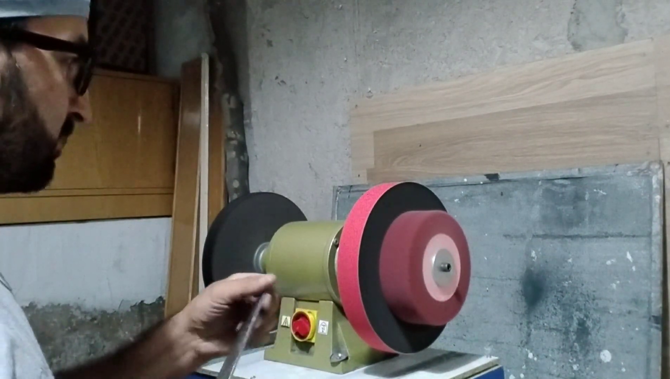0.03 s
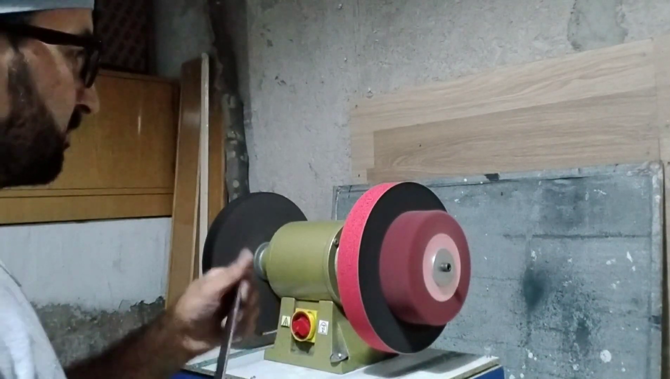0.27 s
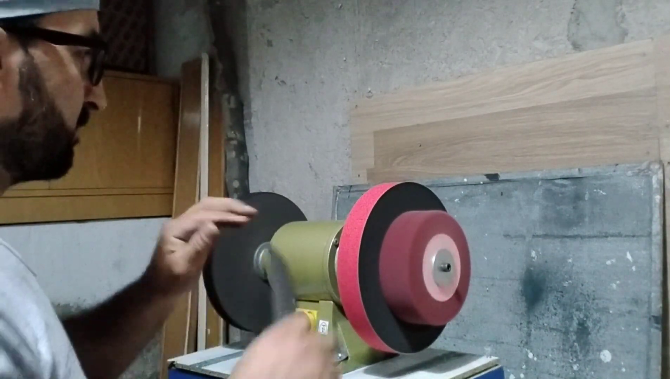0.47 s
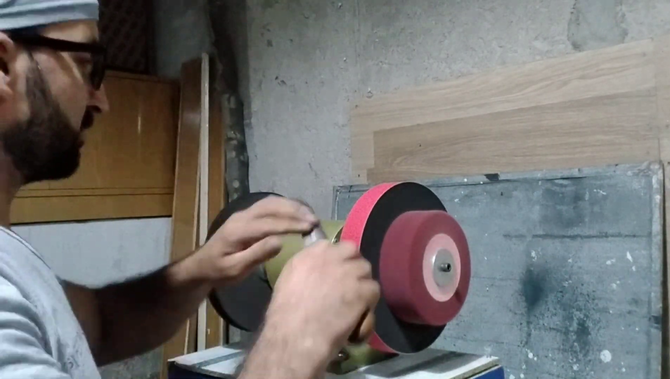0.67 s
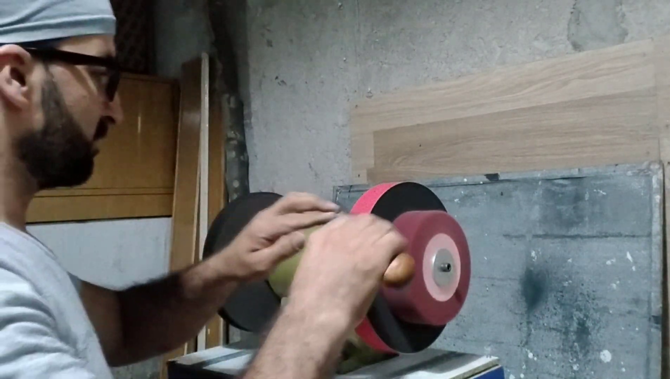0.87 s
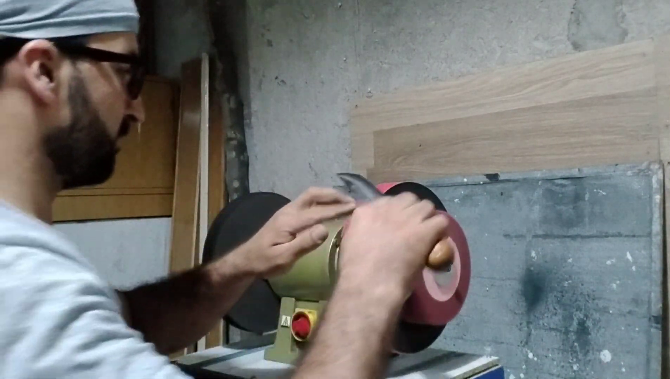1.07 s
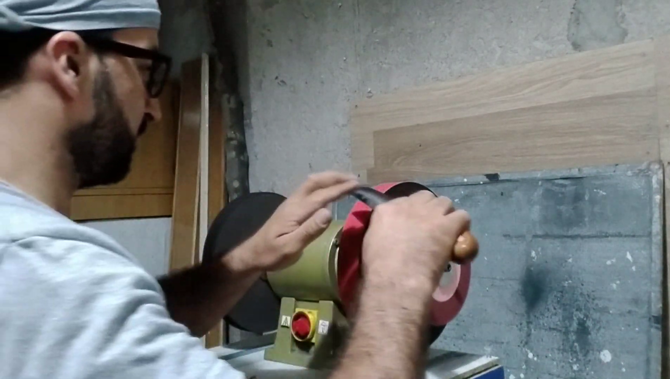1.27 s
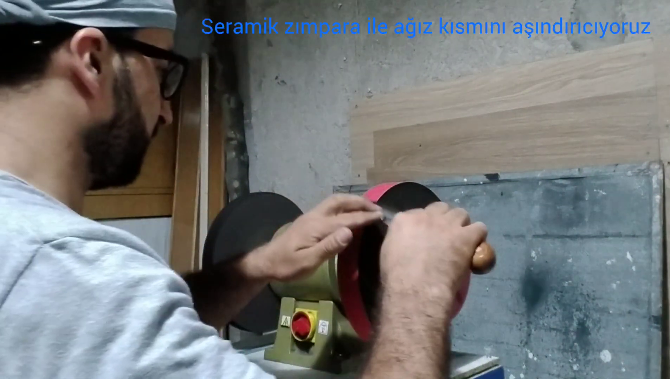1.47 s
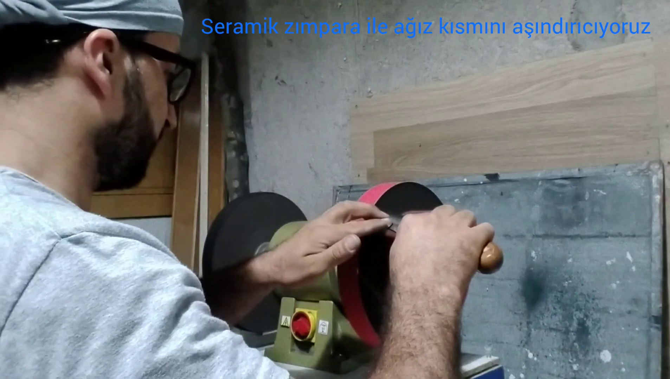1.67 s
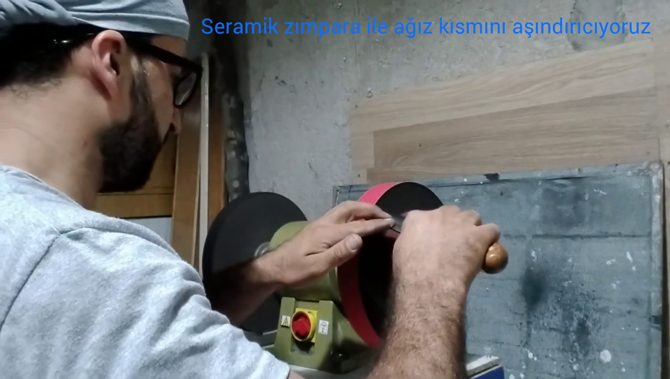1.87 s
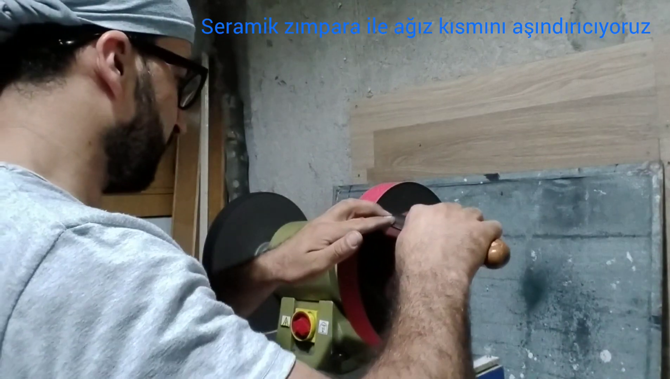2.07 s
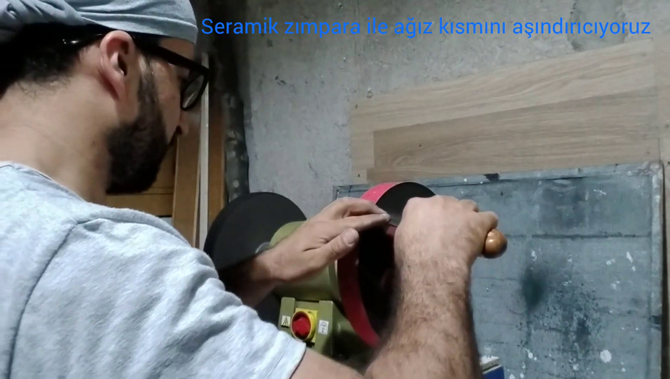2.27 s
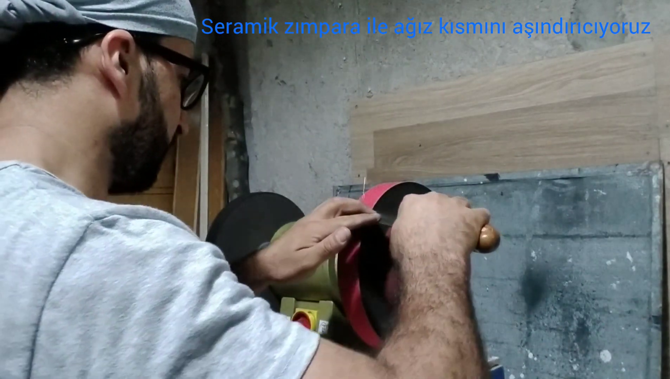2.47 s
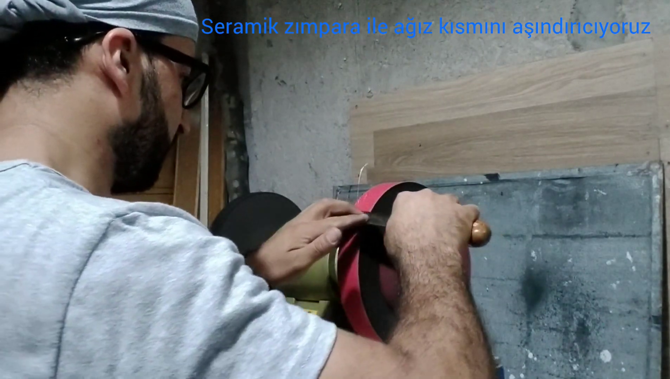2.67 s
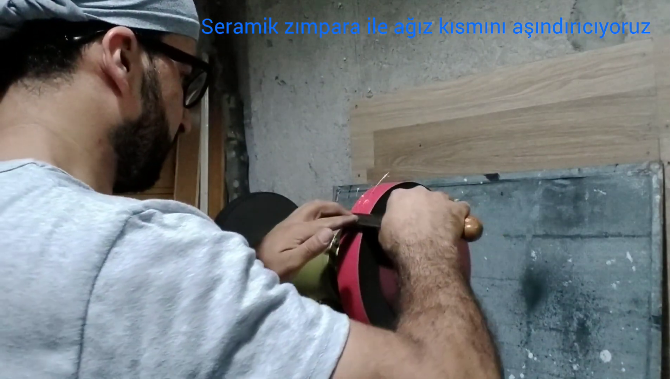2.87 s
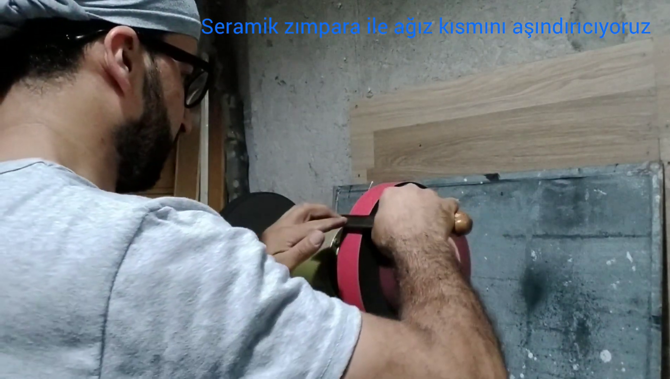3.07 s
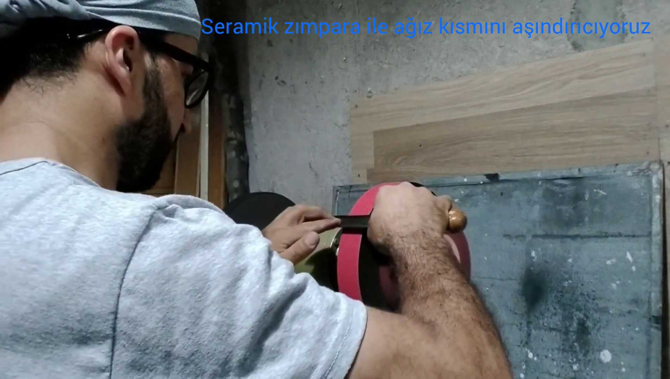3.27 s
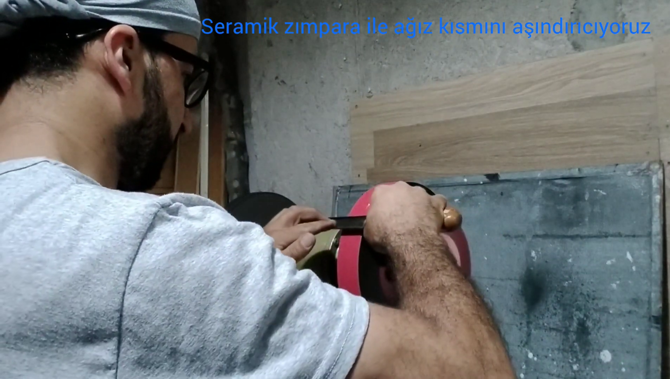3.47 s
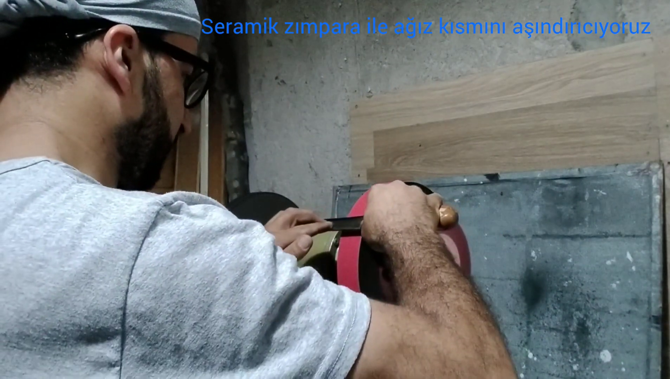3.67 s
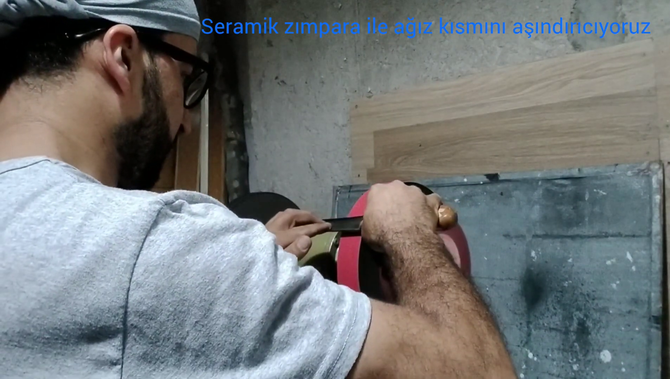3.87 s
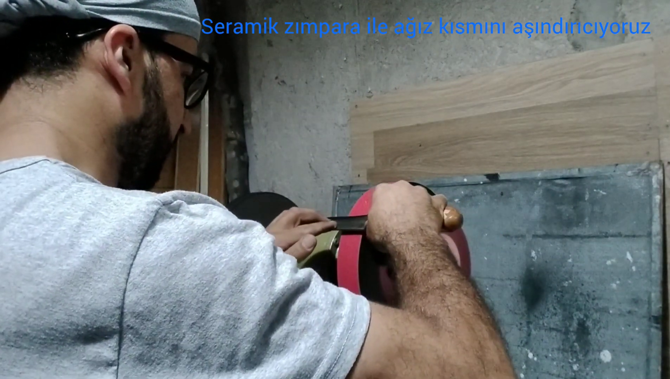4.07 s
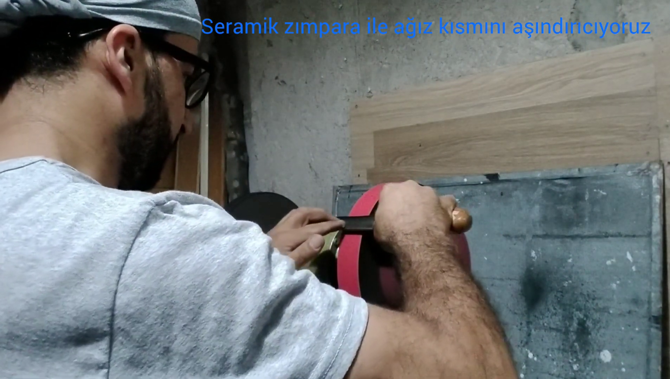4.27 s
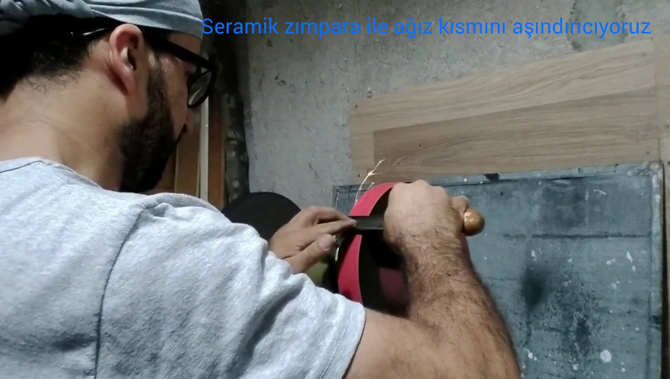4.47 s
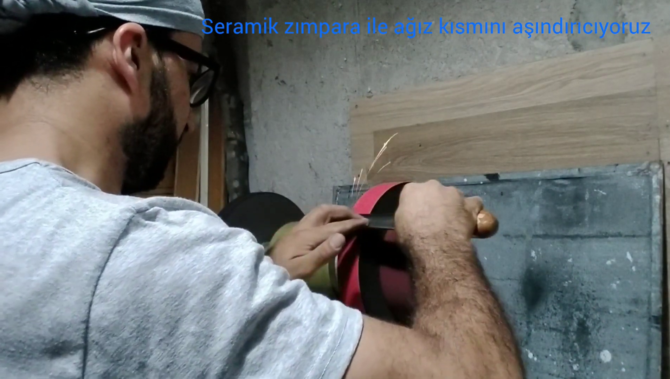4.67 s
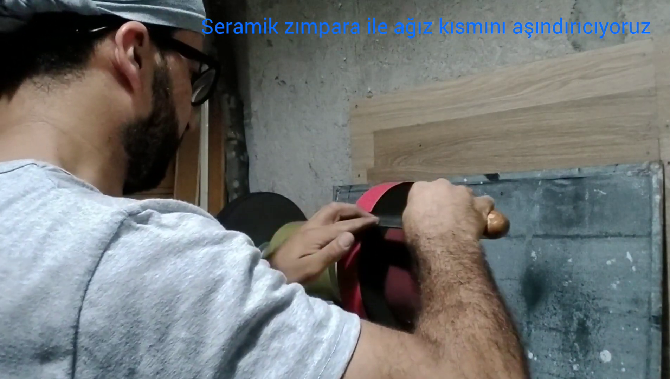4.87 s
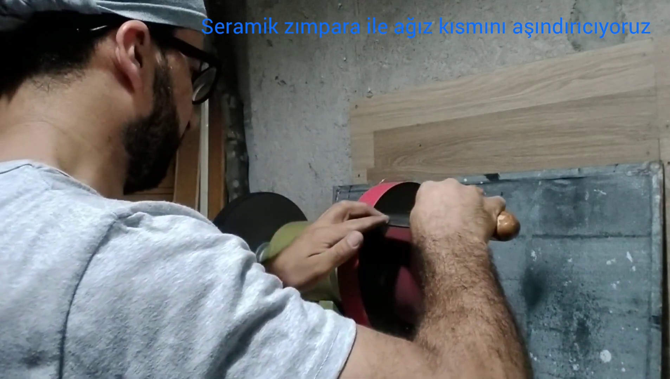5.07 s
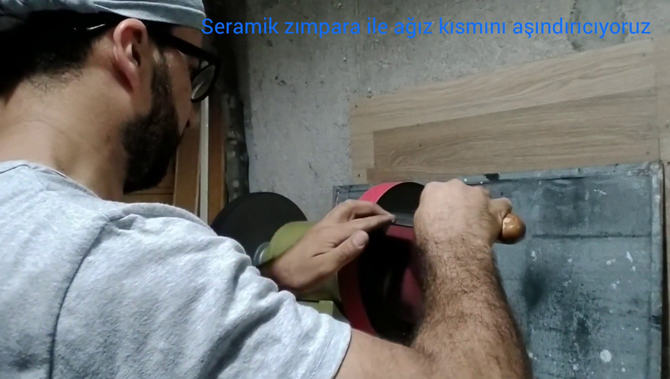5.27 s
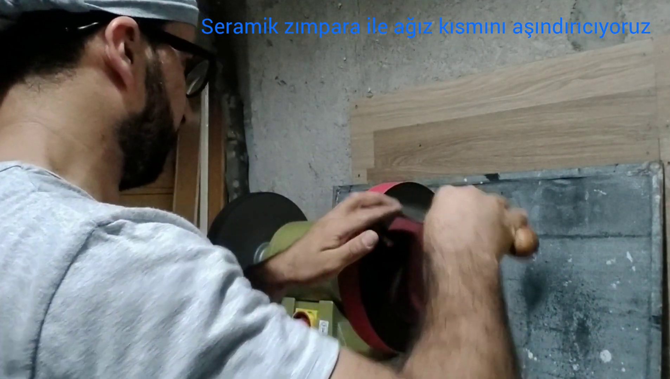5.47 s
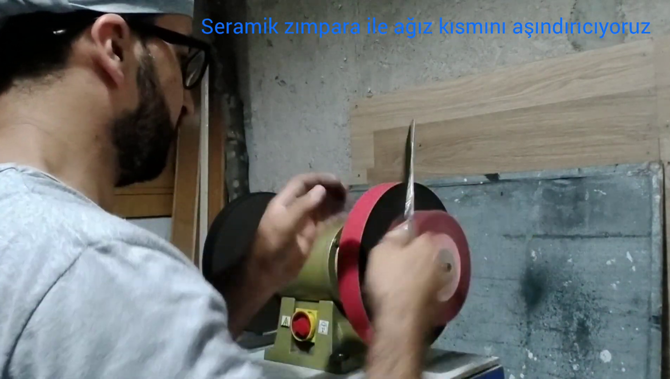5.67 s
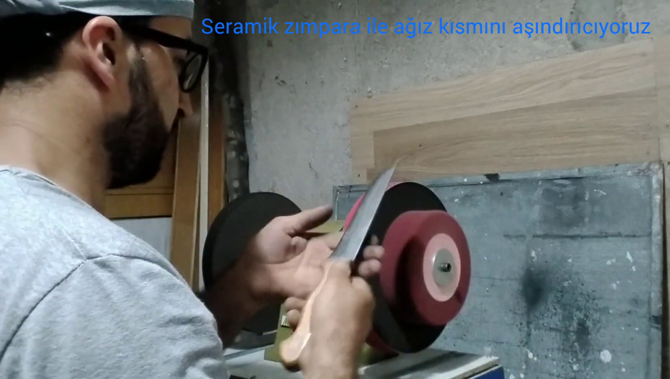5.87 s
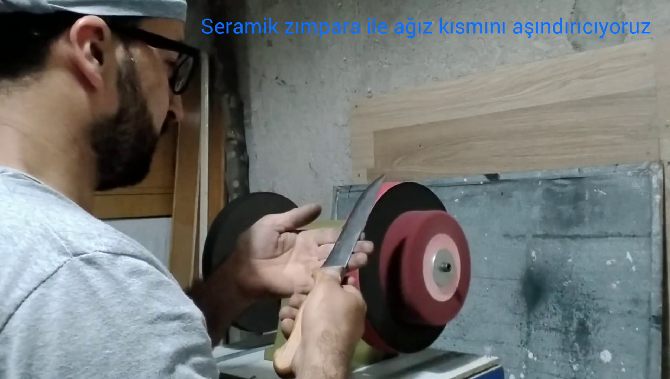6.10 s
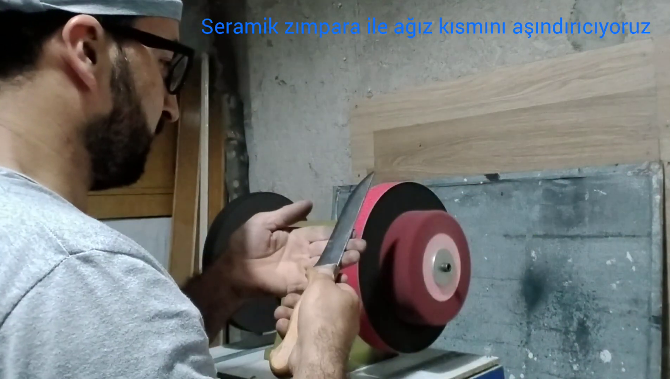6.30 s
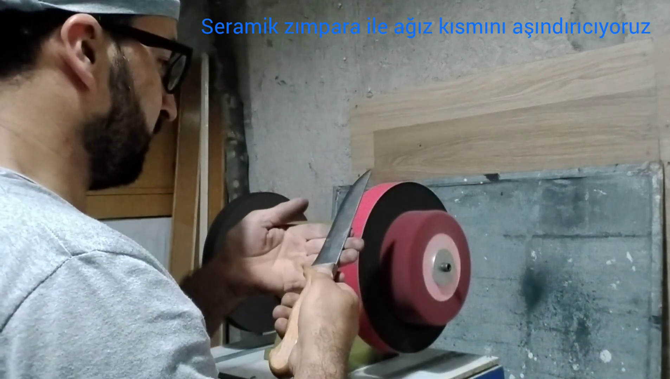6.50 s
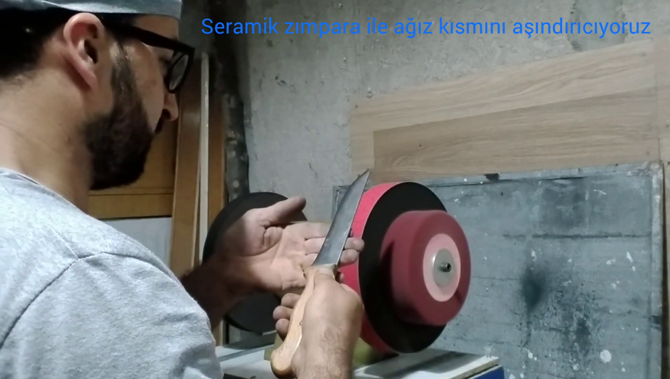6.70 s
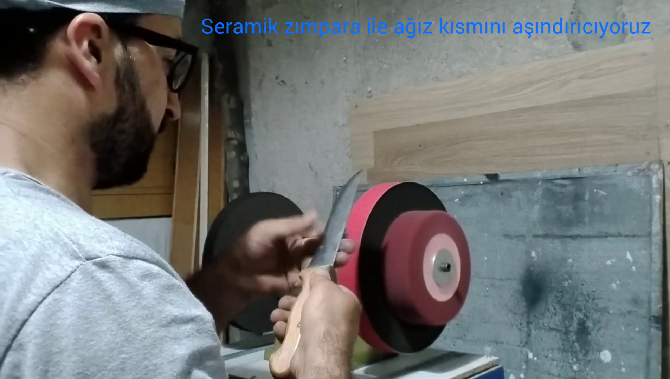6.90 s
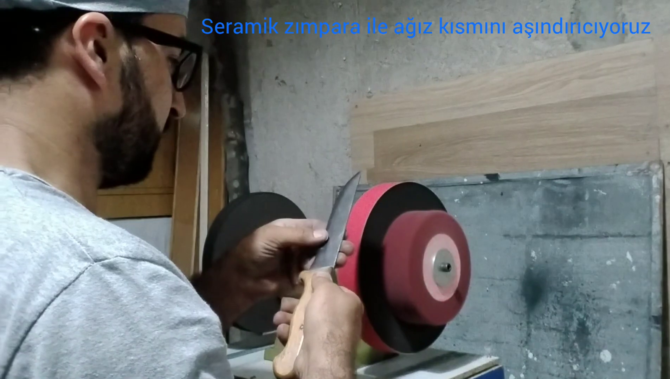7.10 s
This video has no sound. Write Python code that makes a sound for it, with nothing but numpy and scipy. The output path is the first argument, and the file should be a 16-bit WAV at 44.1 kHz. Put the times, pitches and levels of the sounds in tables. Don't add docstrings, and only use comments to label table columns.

```python
import sys
import numpy as np
from scipy import signal
from scipy.io import wavfile
from scipy.ndimage import uniform_filter1d

SR = 44100
rng = np.random.default_rng(int(sys.argv[2]) if len(sys.argv) > 2 else 0)


def voltage_ratio(decibels):
    exponent = np.asarray(decibels, float) / 20
    return 10 ** exponent


def dump(signal):
    limited = np.clip(np.atleast_2d(signal).T, -1, 1)
    pcm = np.round(limited * 32767).astype(np.int16)
    wavfile.write(sys.argv[1], SR, pcm)


N = 314874


def evened(x):
    return x / np.sqrt(np.mean(x ** 2) + 1e-20)


def curve(rows):
    s, *columns = np.transpose(rows)
    return [np.interp(np.arange(N) / SR, s, c) for c in columns]


def colour(points, lo_hz=0, hi_hz=SR):
    hz = abs(np.fft.fftfreq(4096, 1 / SR)) + 1
    f, db = np.transpose(points)
    edges = np.sqrt(1 / (1 + (lo_hz / hz) ** 16) / (1 + (hz / hi_hz) ** 16))
    gain = voltage_ratio(np.interp(np.log(hz), np.log(f), db)) * edges
    log_gain = np.log(np.maximum(gain, 1e-5))
    return np.fft.ifft(np.exp(np.conj(signal.hilbert(log_gain)))).real[:2048]


def filtered_force(force, taps):
    return signal.oaconvolve(force, taps / np.linalg.norm(taps))[:N]


def slow(rate, count):
    t = np.arange(0, N + 256, 256) / SR
    f, start = rate * rng.random((2, count, 12, 1))
    drift = np.sin(2 * np.pi * (f * t + start / rate)).sum(1) / np.sqrt(6)
    return [np.interp(np.arange(N) / SR, t, d) for d in drift]


# (t/s, turns per s)
SHAFT_SPEED = [(0, 49.2), (2.15, 49.2), (3.35, 49.03), (3.85, 49.09), (4.75, 48.97), (5.4, 48.95),
               (7.14, 49.1)]


def shaft_turns():
    return np.cumsum(curve(SHAFT_SPEED)[0]) / SR


def wheel(turns, keep, smooth=1, size=7200):
    rim = uniform_filter1d(rng.standard_normal((355, 900)), smooth, axis=1, mode="wrap")
    starts = np.searchsorted(turns, np.arange(1, int(turns[-1]) + 1))
    for k, same in enumerate(keep[starts], 1):
        rim[k] = same * rim[k - 1] + np.sqrt(1 - same ** 2) * rim[k]
    fine = signal.resample(rim, size, axis=1).ravel()
    return evened(np.interp(turns * size, np.arange(fine.size), fine))


def room(x):
    t60_s, top_t60_s, level_db = 0.22, .15, -5.5
    t = np.arange(SR // 2) / SR
    taps = rng.standard_normal(len(t)) * (t > .003)
    low = signal.lfilter(*signal.butter(2, 9000, fs=SR), taps)
    tail = low * voltage_ratio(-60 * t / t60_s) + (taps - low) * voltage_ratio(-60 * t / top_t60_s)
    return x + voltage_ratio(level_db) * filtered_force(x, tail)


# (multiple of shaft speed, level/dB, waver/dB, start/turns)
SHAFT_HUM = [(1, -44, .6, .0), (2, -56.5, .8, .1), (3, -56, 1.3, .2), (4, -69, 2.5, .3), (5, -70, 2.5, .4),
             (6, -72, 2.5, .6), (7, -74, 2.5, .7)]
# (f/Hz, level/dB)
BEARING_WHINE = [(494, -69), (753.7, -69), (1120, -68.5), (1825, -67), (2067, -70), (2299, -71),
                 (2340, -69), (2530, -68.5), (2630, -67), (2898, -62.5), (2998, -69), (3165, -69),
                 (3703, -64), (3801, -72), (3971, -66), (4070, -71), (4157, -66), (4554, -68),
                 (4774, -56.5), (4872, -61), (5042, -67), (5109, -69), (5308, -69), (5577, -61),
                 (5626, -64), (5675, -64), (5944, -67), (6182, -63), (6212, -63), (6481, -68)]
# (f/Hz, level/dB per Hz)
FAN_COLOUR = [(120, -29), (210, -6.5), (653, -10), (767, -4.5), (952, -9.0), (1490, -10.5), (2850, -7),
              (4560, -5), (4900, -3.5), (5360, -5.5), (8110, -1.5), (10800, -16), (15500, -9.5)][1:]


def motor(turns):
    mains_hz, mains_db, mains_start_turns, fan_db = 99.54, -63, .36, -44
    t = np.arange(N) / SR
    hum = np.zeros(N)
    for (k, db, waver_db, start), drift in zip(SHAFT_HUM, slow(3.0, count=len(SHAFT_HUM))):
        hum += voltage_ratio(db + waver_db * drift) * np.sin(2 * np.pi * (k * turns + start))
    hum += voltage_ratio(mains_db) * np.sin(2 * np.pi * (mains_hz * t + mains_start_turns))
    drifts = slow(5.0, count=10)
    whine = np.zeros(N)
    for k, (f, db) in enumerate(BEARING_WHINE):
        phase = 2 * np.pi * f * t + 1.04 * drifts[5 + k % 4]
        whine += voltage_ratio(db + 1.1 * drifts[k % 5]) * np.sin(phase)
    whine *= 1 + 0.26 * np.cos(2 * np.pi * turns) + 0.15 * np.cos(2 * np.pi * 2 * turns)
    stir = .86 * rng.standard_normal(N) + .5 * wheel(turns, np.full(N, .97))
    hiss = evened(signal.oaconvolve(stir, colour(FAN_COLOUR))[:N])
    return np.sqrt(2) * (hum + whine) + voltage_ratio(fan_db + .4 * drifts[9]) * hiss


# (t/s, level/dB)
BENCH_JOLTS = [
    (2.779, -28),
    (2.87, -47),
    (3.03, -26),
    (3.05, -42),
    (3.46, -50),
    (4.241, -41),
    (4.49, -35),
    (4.62, -47),
    (4.76, -47),
    (4.98, -37),
]


def jolts():
    pushes, u = np.zeros(N), np.arange(4000) / SR
    for s, db in BENCH_JOLTS:
        pushes[round(s * SR)] = voltage_ratio(db)
    sway = 1.2 * np.sin(2 * np.pi * 55 * u) * np.exp(-u / 0.021)
    return signal.oaconvolve(pushes, sway)[:N]


# (t/s, level/dB, list of tones (f/Hz, level/dB, time to fall 60 dB/s))
FINGER_TAP = (1.023, -30, [(780, -10, .045), (1500, -5, .02), (2050, 0, .024), (2350, -3, .02),
              (1150, -8, .016)])


def tick():
    s, db, modes = FINGER_TAP
    u = np.maximum(np.arange(N) / SR - s, 0)
    ring = sum(voltage_ratio(d - 60 * u / t60) * np.sin(2 * np.pi * f * u) for f, d, t60 in modes)
    return voltage_ratio(db) * ring * np.minimum(u / .003, 1)


# (f/Hz, width/Hz, level/dB against the hiss)
BENDING_TONES = [(492, 40, -30), (986, 45, -25), (2610, 55, -25), (3700, 45, -25), (4550, 90, -23),
                 (4830, 110, -28)]
# (from/s, to/s, level/dB, tilt/dB per octave)
LOOSE_GRIP = [
    (1.7, 2.63, 3, -1.5),
    (3.5, 4.24, -2.5, 2),
]
# (from/s, to/s, f/Hz, level/dB against the hiss)
PASSING_RINGS = [
    (1.7, 1.9, 4390, -21),
    (2.25, 2.5, 4080, -24),
    (2.7, 3.22, 4310, -23),
    (3.1, 3.55, 4580, -22),
    (4.4, 4.75, 4600, -28),
    (4.85, 5.5, 4200, -24),
    (4.8, 5.5, 4800, -26),
    (5.1, 5.57, 985, -19),
    (5.15, 5.55, 1640, -29),
]


def bending(drive):
    out = np.zeros(N)
    rings = [(begin, end, f, width_hz, db + spell_db + tilt_db * np.log2(f / 1000))
             for f, width_hz, db in BENDING_TONES for begin, end, spell_db, tilt_db in LOOSE_GRIP]
    rings += [(begin, end, f, 70, db) for begin, end, f, db in PASSING_RINGS]
    for begin, end, f, width_hz, db in rings:
        r = np.exp(-np.pi * width_hz / SR)
        spell = slice(round(begin * SR), round(end * SR))
        ring = signal.lfilter([1, 0, -1], [1, -2 * r * np.cos(2 * np.pi * f / SR), r * r], drive[spell])
        fade = signal.windows.tukey(len(ring), .15)
        out[spell] += voltage_ratio(db) * np.sqrt((1 - r * r) / 2) * ring * fade
    return out


# (f/Hz, width/Hz, level/dB over the scrape)
BLADE_TONES = [(6470, 130, -3.5), (6900, 200, -10.5), (7680, 120, -7), (8090, 210, -1), (8530, 180, -5.5),
               (8730, 150, 6), (9100, 84, -3.5), (10550, 110, 4), (12370, 550, 0.5), (13990, 410, -4.5),
               (14760, 380, 0), (15465, 680, 8.5)]
# (t/s, half length/s, tone number, swell/dB)
BLADE_SINGS = [(2.42, .22, 3, 9), (2.6, .12, 11, 4), (3.0, .12, 4, 6), (3.0, .1, 7, 4), (3.36, .16, 5, 8),
               (4.0, .3, 6, 6), (4.22, .15, 1, 8), (4.5, .1, 5, 8), (4.5, .12, 9, 8), (4.66, .06, 8, 10),
               (5.0, .09, 2, 10), (5.09, .08, 3, 10), (5.2, .12, 10, 9), (5.42, .1, 4, 9)]


def blade(x):
    hz, t, z = signal.stft(x, SR, nperseg=512, noverlap=384)
    lift = np.ones(z.shape, np.complex64)
    count = len(BLADE_TONES)
    drifts = [np.append(d[::128], np.zeros(8))[:len(t)] for d in slow(1.626, count=2 * count)]
    swell_db = 2.5 * np.array(drifts[count:])
    for s, half, mode, db in BLADE_SINGS:
        swell_db[mode] += db * np.exp(-((t - s) / half) ** 4)
    for (f, width_hz, db), extra_db, d in zip(BLADE_TONES, swell_db, drifts):
        off_tune_hz = hz[:, None] - f * (1 + .004 * d)
        lift += voltage_ratio(db + extra_db) / (1 + 2j * off_tune_hz / width_hz)
    noise = uniform_filter1d(rng.standard_normal(z.shape), 7, 0)
    patches_db = 1.3 * evened(uniform_filter1d(noise, 45, 1))
    return signal.istft(z * lift * voltage_ratio(patches_db), SR, nperseg=512, noverlap=384)[1][:N]


# (t/s, pressure as hiss level/dB, bite of the edge, about -1 to 1)
STROKE_PRESSURE = [(1.91, -14, 0.82), (1.95, -23, -0.67), (2.17, -22, 0.036), (2.31, -18, -0.19),
                   (2.55, -16, -0.19), (3.0, -13, 0.29), (3.22, -15, 0.32), (3.39, -14, -0.34),
                   (3.61, -19, 0.000092), (3.92, -21, -1.04), (4.17, -18, -0.19), (4.51, -12.5, 0.47),
                   (4.88, -12.5, 0.053), (5.08, -13.5, 0.29), (5.22, -15, 0.37), (5.39, -15, -0.84),
                   (5.49, -15, -0.14), (5.567, -26, -0.58)]
# (t/s, level/dB, contact length/s)
EDGE_BOUNCES = [(1.739, -15.5, 0.0048), (1.76, -33, .004), (1.772, -16.5, 0.0084), (1.803, -19.5, 0.012),
                (1.863, -18.5, 0.0065), (1.915, -20.5, .012), (1.937, -20, 0.0067), (1.952, -18, 0.011),
                (1.989, -16.5, 0.0089), (2.012, -21, .003), (2.025, -18.5, .008), (2.043, -32, .004),
                (2.067, -18, 0.0062)]
# (level/dB, dB per unit of bite, extra dB per dB of pressure)
STROKE_LAYERS = [
    (0, -1, 0),
    (1, 3.5, -0.5),
    (-11, 3.5, -0.12),
    (-18, 7.5, .5),
]
# hiss, sizzle, body, rumble (level/dB)
BOUNCE_LAYERS = [0, -3.5, -13, -29]


def contact():
    usual_db, dull_s, dull_db = -15, .25, -5
    crack, crack_s = 2.4, 0.00068
    t = np.arange(N) / SR
    press_db, bite = curve(STROKE_PRESSURE)
    begin, end = STROKE_PRESSURE[0][0], STROKE_PRESSURE[-1][0]
    levels_db = [press_db + db + tilt_db * bite + heavy * (press_db - usual_db)
                 for db, tilt_db, heavy in STROKE_LAYERS]
    power = voltage_ratio(levels_db) ** 2 * ((t > begin) & (t < end))
    power *= np.clip((t - 1.85) / 0.3, 0, 1) ** 1.76
    power[1] *= voltage_ratio(dull_db * np.clip(1 + (t - end) / dull_s, 0, 1)) ** 2
    for s, db, length in EDGE_BOUNCES:
        free = s < begin
        rise = 0.00093 if free else 0.44 * length
        u = np.maximum(t - s, 0) / length
        skip = np.clip((t - s) / rise, 0, 1) ** 2 * np.exp(-u ** 1.56) * voltage_ratio(db) ** 2
        skip *= 1 + crack * free * np.exp(-u * length / crack_s)
        power += skip * voltage_ratio(BOUNCE_LAYERS)[:, None] ** 2
    return np.sqrt(power)


def pops(hiss, force, pressure):
    excess = np.maximum(hiss / (force + 1e-6) - (2.6 - .85 * pressure), 0)
    excess -= uniform_filter1d(excess, size=8192)
    return excess / np.sqrt(uniform_filter1d(excess ** 2, size=8192).clip(0) + 1e-4)


def grit_kept(t):
    skipping, bedded_in, lost_per_bite = .2, .93, .03
    bedded = np.sqrt(np.clip((t - 1.95) / .33, 0, 1))
    bite = curve(STROKE_PRESSURE)[1].clip(-1, 1)
    return skipping + bedded * (bedded_in - skipping - lost_per_bite * bite)


# (t/s, level/dB)
WHEEL_THROB = [
    (1.9, -9),
    (2.25, -0.3),
    (3.2, 2.5),
    (4.4, 5),
    (5.0, -2.5),
]
# (f/Hz, level/dB per Hz)
SCRAPE_COLOUR = [(100, -50), (170, -23.0), (294, -19.5), (362, -24), (490, -21), (560, -20), (3130, -17.5),
                 (5510, -16.5), (6410, -7), (7750, -1.0), (8680, -3.5), (11100, -6.0), (15600, -2)][1:-1]


def grinding(turns, keep):
    throb = curve(WHEEL_THROB)[0]
    throb_db = keep ** 2 * throb * np.cos(2 * np.pi * (turns - .88))
    lumps_db = 2.0 * keep * wheel(turns, keep, smooth=24, size=900) + throb_db
    grit = evened(wheel(turns, keep) * voltage_ratio(lumps_db))
    crackle = rng.standard_normal(N)
    bursts_db = 3.5 * np.minimum(rng.exponential(1, N), 5)
    torn = evened(crackle * voltage_ratio(1.5 * lumps_db + bursts_db))

    # (from f/Hz, to f/Hz, share of fresh crackle)
    bands = [(5650, 10190, 0.11), (9730, 17700, 0.34), (2310, 5530, 0.59), (64, 2390, 0.68)]
    forces, layers = contact(), []
    pressure = np.clip(forces[3] / voltage_ratio(-27), 0, 1)
    for force, (lo_hz, hi_hz, fresh) in zip(forces, bands):
        repeating = grit if len(layers) < 3 else pops(layers[0], forces[0], pressure)
        drive = np.sqrt(1 - fresh ** 2) * repeating + fresh * torn
        layers.append(filtered_force(drive * force, colour(SCRAPE_COLOUR, lo_hz, hi_hz)))
    shudder = filtered_force(torn * forces[3], colour(SCRAPE_COLOUR, 22, 133))
    layers.append(voltage_ratio(-15.5) * shudder)

    eased = forces[0] / (1 + (forces[0] / 0.63) ** 2)
    knock = evened(np.diff(np.floor(turns - .85), prepend=0).clip(0))
    knock_force = .9 * keep * knock * np.clip(throb / 2.5, .4, 1)
    scrape = voltage_ratio(-4) * blade(sum(layers))
    return scrape, bending((.45 * grit + knock_force) * eased)


def scene():
    turns = shaft_turns()
    scrape, ring = grinding(turns, grit_kept(np.arange(N) / SR))
    mix = room(scrape + tick()) + ring + motor(turns) + jolts()
    return np.array([mix, mix])


def top_cut(x):
    return signal.sosfilt(signal.butter(12, 17130, fs=SR, output="sos"), x)


def record(dry):
    loud = .8 * np.tanh(dry / .8)
    low_pass = signal.firwin(801, 15740, window=("kaiser", 9), fs=SR)
    limited = signal.oaconvolve(loud, low_pass[None], "same")
    return top_cut(limited)


dry = scene()
out = record(dry)
dump(out)
```